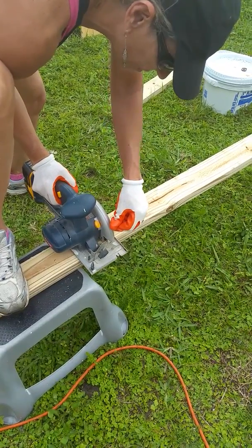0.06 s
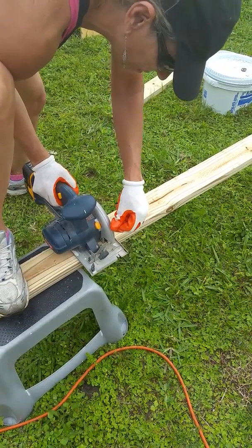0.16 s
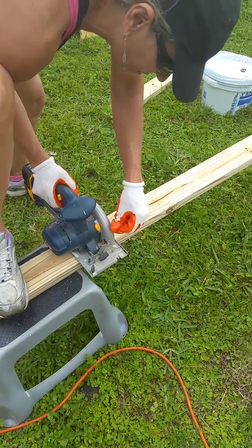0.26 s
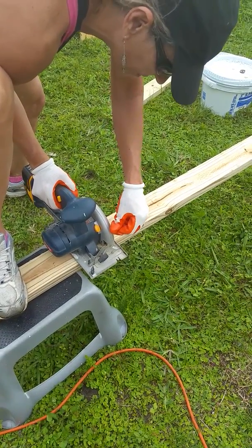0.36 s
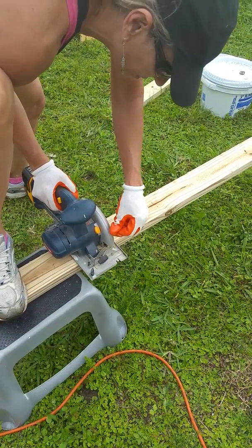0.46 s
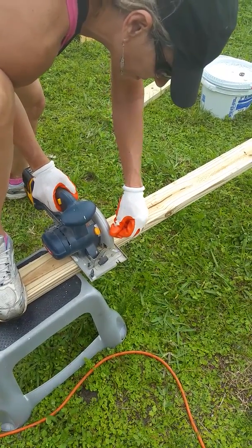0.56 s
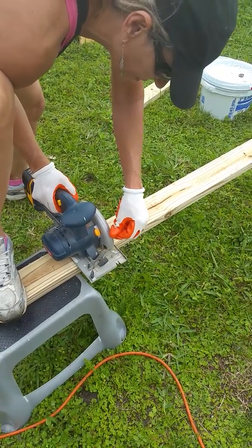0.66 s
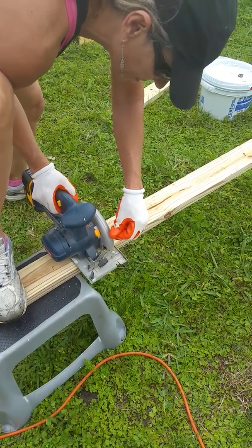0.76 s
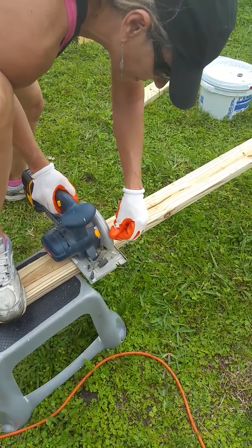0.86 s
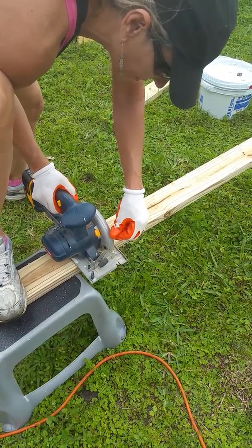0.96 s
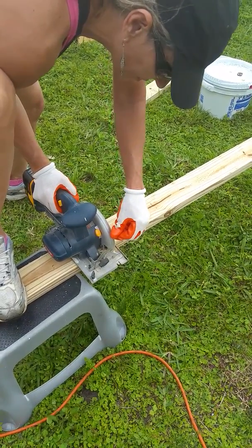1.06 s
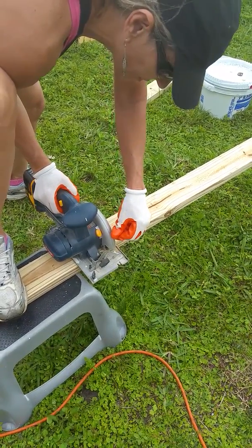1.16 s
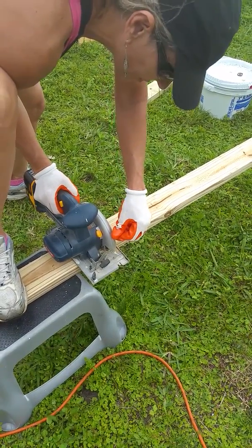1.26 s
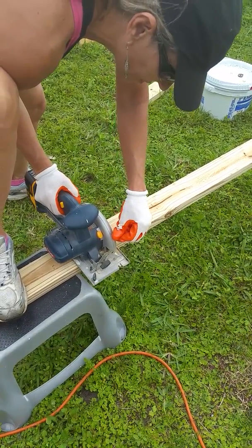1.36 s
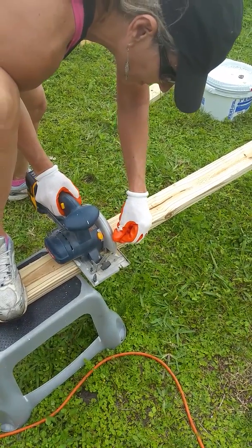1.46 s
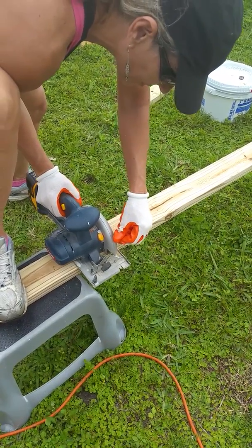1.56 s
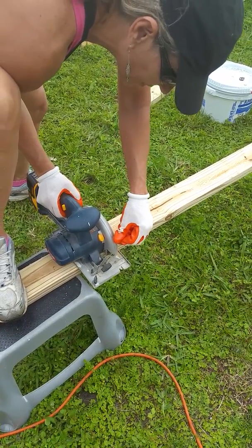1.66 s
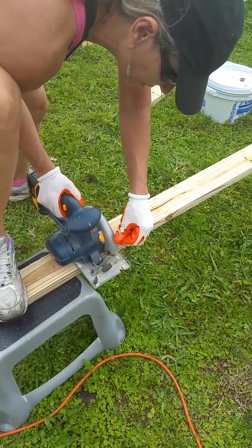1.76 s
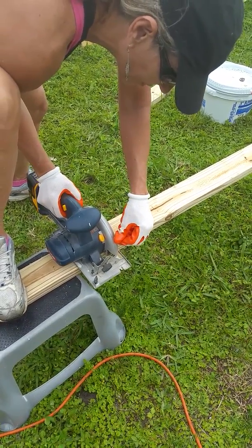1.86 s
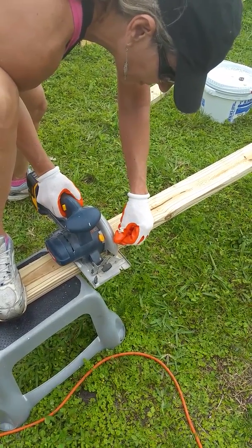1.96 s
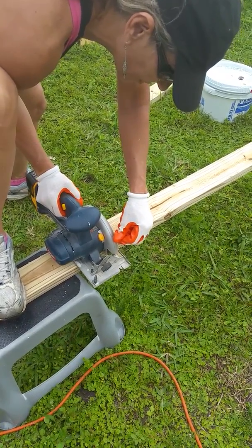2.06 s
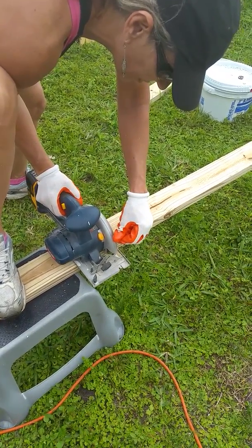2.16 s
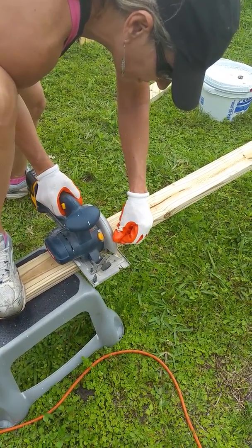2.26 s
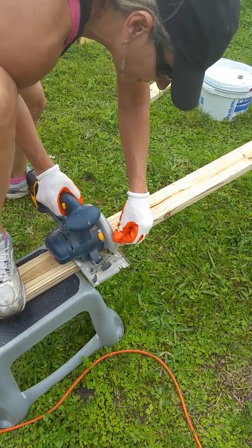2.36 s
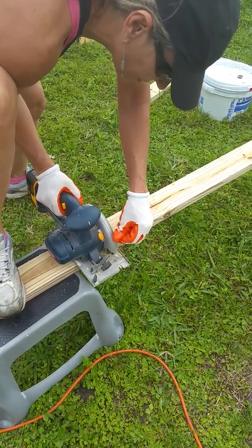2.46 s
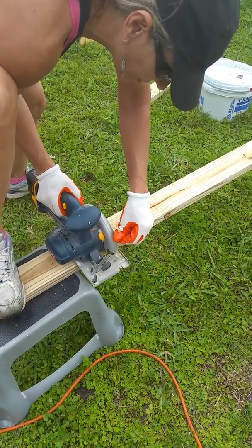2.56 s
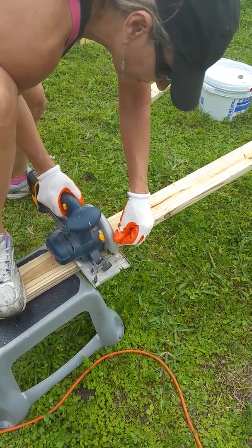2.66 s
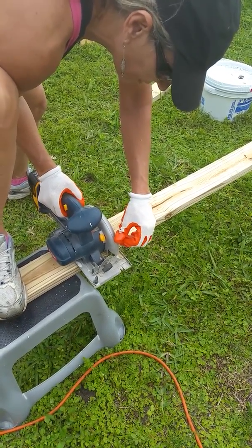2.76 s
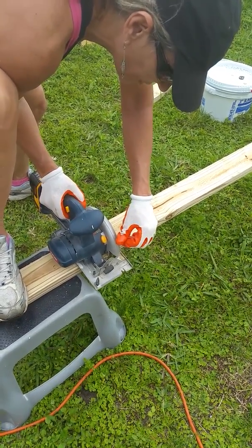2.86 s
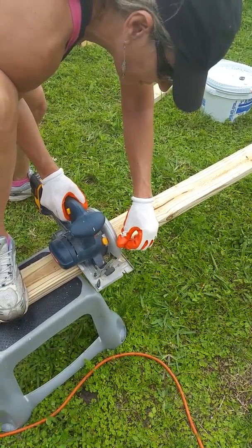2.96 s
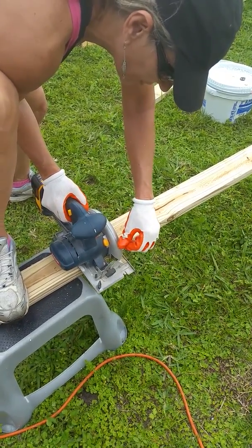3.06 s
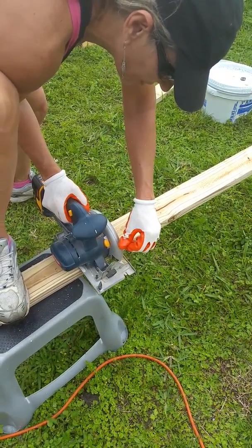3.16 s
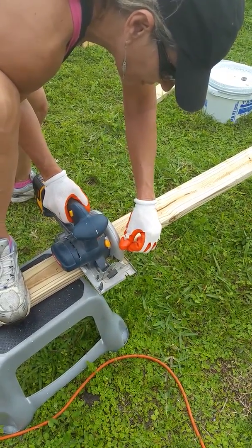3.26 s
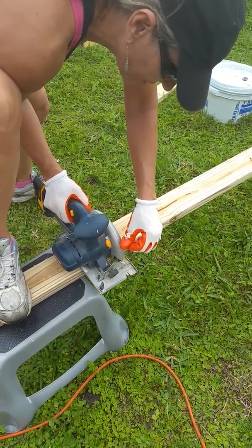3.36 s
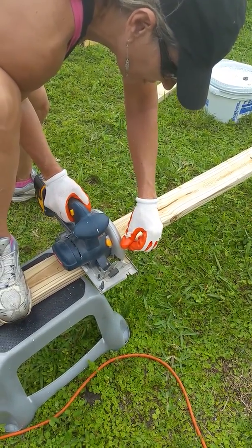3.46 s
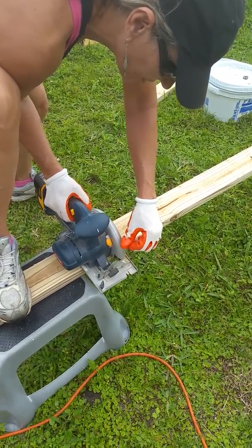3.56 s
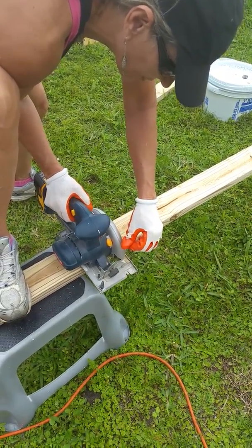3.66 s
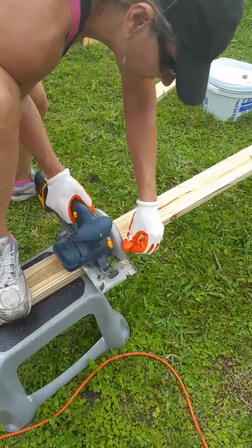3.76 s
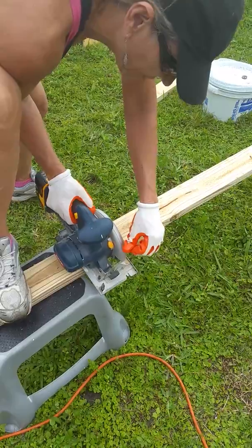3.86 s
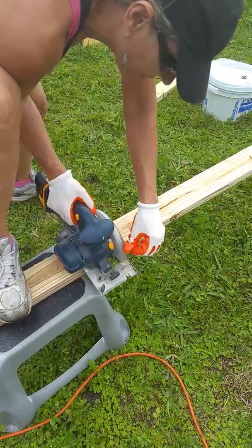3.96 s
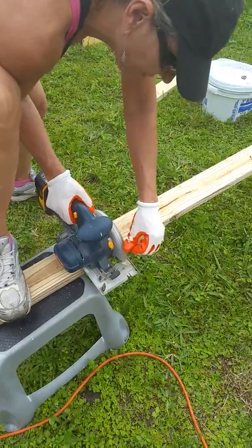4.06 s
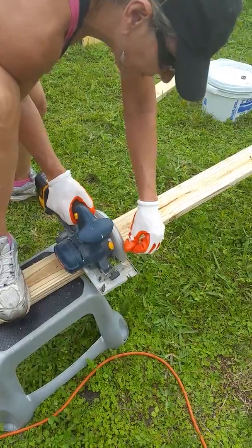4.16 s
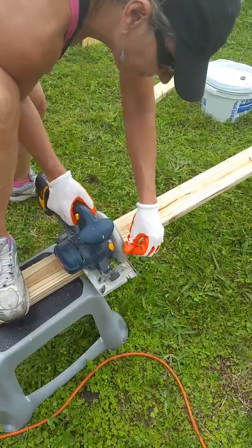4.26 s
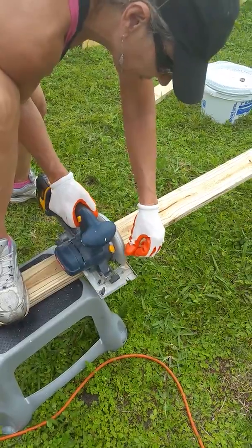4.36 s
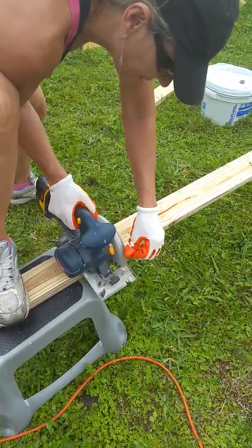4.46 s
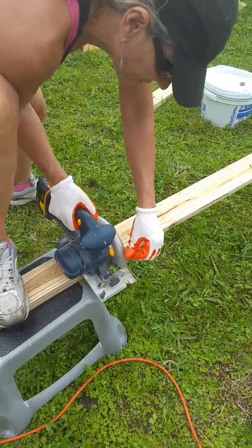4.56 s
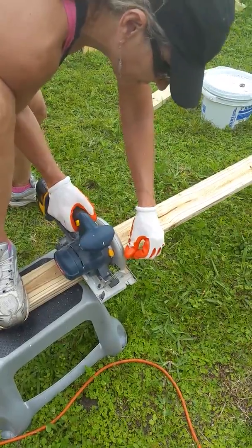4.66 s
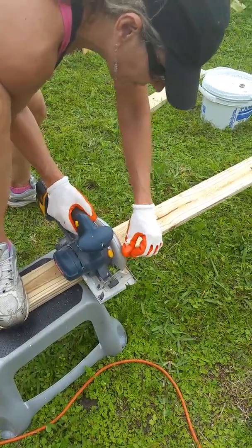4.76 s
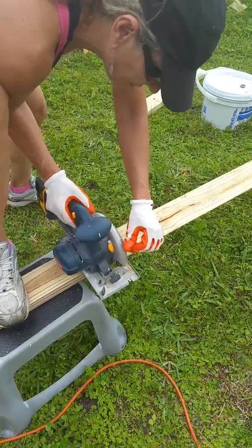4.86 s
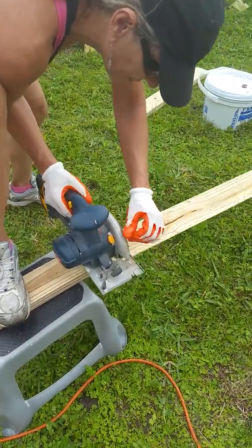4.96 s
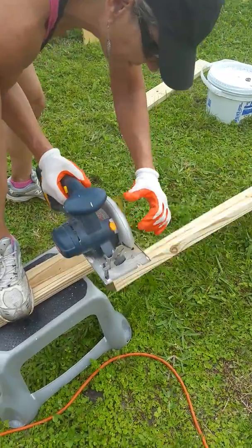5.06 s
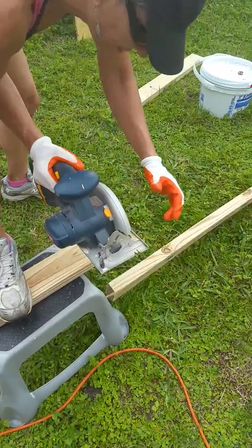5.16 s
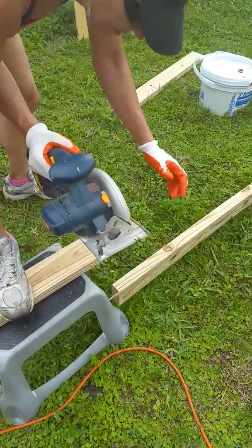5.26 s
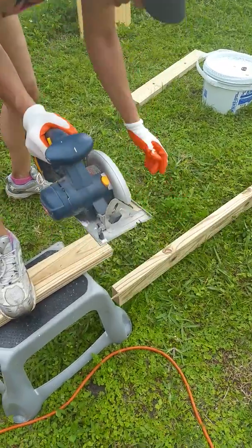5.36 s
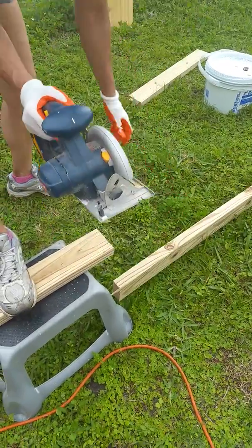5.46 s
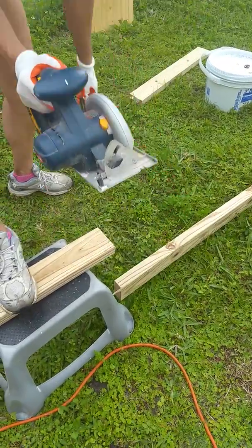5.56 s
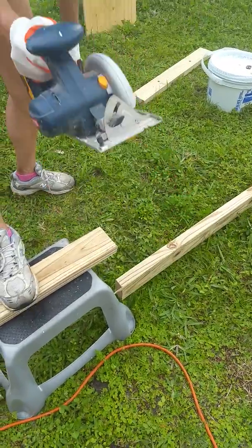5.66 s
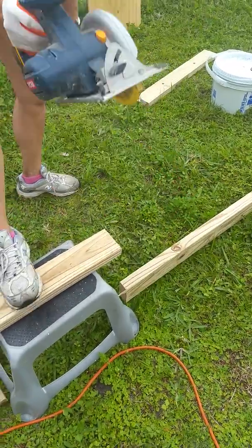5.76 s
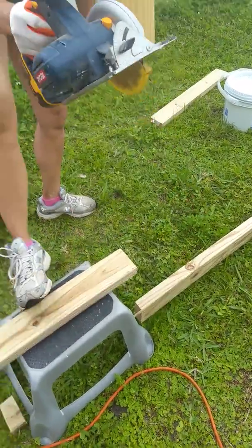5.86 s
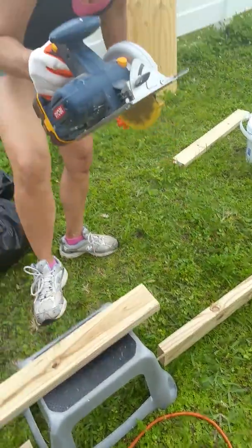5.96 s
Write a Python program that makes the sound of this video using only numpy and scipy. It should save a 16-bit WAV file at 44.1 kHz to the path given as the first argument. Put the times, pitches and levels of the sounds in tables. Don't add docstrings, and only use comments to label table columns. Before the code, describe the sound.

From 0 s a circular saw is cutting wood close by outdoors: dense bright hiss, woody mid-range roar and a gear whine, pulsing roughly fifty times a second. The pitch sinks until about 1.6 s, recovers slightly near 2.3 s, where a short dull bump hits the microphone, then sinks again. Around 3 s the cut pinches; the roar swells and speed drops sharply. From 3.1 to 4.3 s it labors unevenly with growling whine and ringing, stuttering grabs. At 4.4 s it brakes, falling into rapid gear knocks and brushy hiss, stopping at 4.77 s. Small ticks and quiet follow. At 5.1 s fibres crack; at 5.24 s a loud snap and hollow wooden knocks, with gritty metal scraping to 5.35 s. Lighter knocks and thuds come at 5.4-5.55 s, faint steel ringing until a tiny click near 5.8 s. Distant traffic and airy hiss rise, ending with a low wind puff at 6 s.

```python
import sys
import numpy as np
from scipy import signal
from scipy.fft import rfft, irfft, next_fast_len
from scipy.io import wavfile
from scipy.ndimage import uniform_filter1d, map_coordinates

SR = 44100
rng = np.random.default_rng(int(sys.argv[2]) if len(sys.argv) > 2 else 0)


def ratio_of_db(decibels):
    return 10 ** (np.asarray(decibels, float) / 20)


def store_wav(level_fs):
    pcm = np.round(np.clip(np.atleast_2d(level_fs), -1, 1) * 32767)
    wavfile.write(sys.argv[1], SR, pcm.T.astype(np.int16))


N = 265482
T = np.arange(N) / SR
STOP_S = 4.765
PROUD_TURN = 0.36

ORDERS = (18, 19, 42, 84, 168)
# time in seconds, level in dB.
COAST_LEVEL = [(4.3, -72), (4.385, -40), (4.415, -29), (4.455, -28), (4.49, -26), (4.52, -27), (4.56, -29),
               (4.7, -32), (4.73, -30), (4.757, -33), (4.772, -52), (4.82, -72)]
# centre in Hz, width in Hz, level in dB.
WOOD_MODES = [(705, 150, -5.5), (1130, 170, 1), (1474, 120, 0.5), (1677, 74, 5), (1856, 190, 0.5),
              (2390, 840, -6), (4120, 120, -22)]


def unit(x):
    return x / np.sqrt(np.mean(x ** 2) + 1e-20)


def along(points, hz):
    f, v = np.transpose(points)
    return np.interp(np.log(hz + 1), np.log(f + 1), v)


def curves(rows, outside=None):
    s, *cols = np.transpose(rows)
    return [np.interp(T, s, c, outside, outside) for c in cols]


def eased(rows):
    s, v = np.transpose(rows)
    slope = np.diff(v) / np.diff(s)
    a, b = slope[:-1], slope[1:]
    lean = np.r_[slope[0], np.where(a * b > 0, 2 * a * b / (a + b), 0), 0]
    i = np.clip(np.searchsorted(s, T) - 1, 0, len(s) - 2)
    h = s[i + 1] - s[i]
    u = np.clip((T - s[i]) / h, 0, 1)
    step = (v[i + 1] - v[i]) * u * u * (3 - 2 * u)
    bend = h * u * (1 - u) * ((1 - u) * lean[i] - u * lean[i + 1])
    return v[i] + step + bend


def wobble(rate):
    return map_coordinates(rng.standard_normal(int(N * rate / SR) + 4), [T * rate])


def hiss_pair():
    return rng.standard_normal((2, N))


def filtered(x, response):
    m = next_fast_len(N + 8192)
    return irfft(rfft(x, m) * response(np.fft.rfftfreq(m, 1 / SR)), m)[..., :N]


def modes(table):
    def response(f):
        return sum((-1) ** k * ratio_of_db(db) * 1j * f * w / (c * c - f * f + 1j * f * w)
                   for k, (c, w, db) in enumerate(table))
    return response


def coloured(x, spectrum):
    y = filtered(x, lambda f: ratio_of_db(along(spectrum, f)))
    return y / np.std(y.mean(axis=0))


def ports(pair, alike=None, lean=None):
    # frequency in Hz, left-right likeness.
    usual_alike = [(100, 0.3), (300, 0.83), (700, 0.49), (1400, 0.58), (3000, 0.5), (6000, 0.45),
                   (9000, 0.494), (14000, 0.3)]
    # frequency in Hz, left minus right in dB.
    usual_lean = [(60, 10), (110, -12), (200, 2), (380, -5.5), (700, 4.5), (1290, -3.5), (2380, -2),
                  (3100, -4), (4400, -6), (6200, -9), (8300, -7.5), (10500, -7.5), (15000, -17.5)]
    # frequency in Hz, left's lead in radians.
    lead = [(0, -0.5), (600, 0), (950, -1.17), (1720, 0.26), (4050, -1.2), (4740, 1.1), (5600, -0.7),
            (6370, -2.5), (7670, -2.0), (11800, -2.1), (14600, -9.5), (16400, -7.1)]
    alike = usual_alike if alike is None else alike
    lean = usual_lean if lean is None else lean

    def likeness(f):
        return np.clip(along(alike, f), 0, 1)

    shared = filtered(pair[0], lambda f: likeness(f) * np.exp(1j * along(lead, f)))
    other = filtered(pair[1], lambda f: np.sqrt(1 - likeness(f) ** 2))
    both = np.array([shared + other, pair[0]])
    return filtered(both, lambda f: ratio_of_db(np.outer([.5, -.5], along(lean, f))))


def rings(rows, swell_s):
    out = np.zeros(N)
    for s, db, hz in rows:
        age = np.maximum(T - s, 0)
        swell = age / swell_s * np.exp(1 - age / swell_s)
        out += ratio_of_db(db) * swell * np.sin(2 * np.pi * hz * age)
    return out


def tearing(s, db, swell_s, t60):
    return ratio_of_db(db - 60 * np.where(T < s, (s - T) / swell_s, (T - s) / t60))


def turns():
    # time in seconds, turns a second.
    loaded = [(0, 60), (.28, 56.3), (.5, 57.3), (.9, 54.66), (1.42, 48.7), (1.57, 47.8), (2.25, 51.65),
              (2.36, 51.2), (2.55, 47.5), (2.71, 46.1), (2.89, 45.4), (2.97, 43.2), (3.045, 41.9),
              (3.115, 42.4), (3.15, 40.4), (3.25, 33.2), (3.29, 31.4), (3.35, 31.3), (3.62, 37.75),
              (3.86, 30.5), (3.9, 31), (3.99, 33.4), (4.05, 34), (4.148, 36.8), (4.172, 34.4),
              (4.205, 32.6), (4.24, 33.9), (4.34, 36.1)]
    # time in seconds, turns a second.
    slowing = [(4.375, 28.5), (4.395, 24.5), (4.41, 21.7), (4.44, 19.6), (4.47, 16.8), (4.51, 13.3),
               (4.53, 11.3), (4.56, 10.8), (4.58, 9.6), (4.6, 9.4), (4.62, 8.7), (4.65, 8.3), (4.685, 7.1),
               (4.705, 7.05), (4.73, 7.5), (4.78, 6.5)]
    speed = uniform_filter1d(eased(loaded + slowing), size=500)
    return speed, np.cumsum(speed) / SR


def bound():
    bind_s = (3.02, 3.26)
    return np.interp(T, bind_s, (0, 1))


def braked():
    leave_s, lag_s = 4.375, 0.12
    return 1 - np.exp(-np.maximum(T - leave_s, 0) / lag_s)


def rim(angle, memory, bite_db):
    # time in seconds, share alike each turn.
    repeat = [(0, .72), (2.9, .72), (3.2, .4), (4.3, .4), (4.5, .2)]
    spots = 800
    fresh = rng.standard_normal((2, int(angle[-1]) + 2, spots))
    worn = signal.lfilter([np.sqrt(1 - memory ** 2)], [1, -memory], fresh, axis=1, zi=fresh[:, :1] * memory)[0]
    kept = np.array([unit(np.interp(angle * spots, np.arange(w.size), w.ravel())) for w in worn])
    share = np.clip(curves(repeat)[0], 0, 1)
    teeth = rng.standard_normal(18 * len(fresh[0]))
    bite = ratio_of_db(bite_db * map_coordinates(teeth, [18 * angle], order=1))
    return bite * (np.sqrt(share) * kept + np.sqrt(1 - share) * hiss_pair())


def patches(x, patchy_db):
    z = signal.stft(x, nperseg=512)[2]
    gain = rng.standard_normal(z.shape[1:])
    gain = uniform_filter1d(uniform_filter1d(gain, size=3, axis=0), size=40, axis=1)
    return signal.istft(z * ratio_of_db(patchy_db * unit(gain)), nperseg=512)[1][:, :N]


def cutting(angle):
    # centre in Hz, width in Hz, level in dB.
    plate = [(2420, 70, 0), (4650, 270, 0), (6535, 80, 3), (7450, 60, 0), (9500, 110, -1), (10450, 150, -2),
             (11600, 200, -1), (12330, 90, -1), (13150, 130, -2), (14550, 120, -1)]
    # frequency in Hz, level in dB per Hz.
    board = [(88, -48.5), (150, -25), (337, -4), (507, -8.5), (602, -4.5), (720, -6.5), (891, -2),
             (1150, 1.5), (1500, -20), (2530, -120)]
    slot = [(680, -60), (1150, -19), (1420, -5), (1620, 2.5), (1800, -1), (1960, -5.5), (2200, -18.5),
            (2860, -68.5), (4840, -120)]
    blade = [(1290, -27), (2200, -2.5), (2440, -5.5), (2620, -2), (2940, 0), (3500, -3.5), (4130, -1),
             (4750, -2.5), (5940, -6), (6510, -1.5), (7000, -7), (9100, -25.5), (15400, -120)]
    chips = [(4120, -46), (7000, -16), (7390, -5.5), (8700, -3.5), (9580, 0.5), (11000, 2), (11900, 2),
             (14000, -3.5), (15000, -7.5), (15750, -5.5), (15900, -38)]
    sag = [(850, -61.5), (1030, -29), (1110, 9), (1190, -9.5), (1400, -59)]
    pinch = [(1450, -60), (1580, -16), (1690, -2), (1790, 0), (1880, -5), (2000, -24), (2200, -60)]
    # dB over the feed, dB gained when bound, dB added under the brake.
    layers = [
        (-22, -1, -5),
        (-7, 3, -18.5),
        (-3, 0.5, -31.5),
        (-3.5, 1, -40),
        (-36.5, 15, -22),
        (-34.5, 20.5, -25.5),
    ]
    # time in seconds, level in dB.
    feed = [(0.0, -20), (0.12, -19), (0.18, -17.5), (0.7, -20.5), (0.93, -18), (1.88, -19), (2.13, -18.5),
            (3.28, -23), (3.59, -20), (3.69, -22.5), (3.93, -20.5), (4.27, -21.5), (4.34, -20)]
    # time in seconds, tilt in dB.
    tilt = [(0, 3), (.4, 0), (1, 0), (2, 0.5), (2.8, -1.5), (3.4, -0.5), (4.3, 0)]
    # time in seconds, gain in dB.
    closing = [(2.84, 0), (2.95, 3), (3.14, 7), (3.24, 0)]

    rub = ports(patches(rim(angle, memory=0.885, bite_db=1.5), patchy_db=1.7))
    rub = filtered(rub, lambda f: 1 + np.abs(modes(plate)(f)))
    shake = rub + ports(hiss_pair())
    rasp = rub * ratio_of_db(1.7 * np.cos(2 * np.pi * (angle + PROUD_TURN)))

    still = np.maximum(T - STOP_S, 0)
    ring_out_db = np.maximum(-1100 * still, -12 - 330 * still)
    feed_db = curves(feed)[0] + 0.16 * wobble(5.6) + ring_out_db
    tilt_db, = curves(tilt)
    sources = (shake, rub, rasp * ratio_of_db(0.45 * tilt_db), rasp * ratio_of_db(-tilt_db), shake, rub)
    bodies = (board, slot, blade, chips, sag, pinch)

    out = ratio_of_db(feed_db + layers[1][0]) * (ratio_of_db(curves(closing)[0]) - 1) * coloured(shake, slot)
    for (db, bind_db, brake_db), x, body in zip(layers, sources, bodies):
        judder_db = (0.16 + 1.5 * braked()) * wobble(20)
        level_db = feed_db + db + bind_db * bound() + brake_db * braked() + judder_db
        out += ratio_of_db(level_db) * coloured(x, body)
    return out


def kerf(speed, angle):
    # time in seconds, centre in Hz, width in Hz, level in dB.
    resonance = [(0, 1587, 35, -20), (.15, 1580, 100, -31), (.55, 1607, 45, -22.5), (.75, 1630, 40, -26),
                 (1.0, 1720, 170, -23), (1.3, 1580, 109, -29), (1.5, 1650, 30, -32.5),
                 (1.82, 1700, 111, -22.5), (2.04, 1700, 90, -25), (2.22, 1814, 100, -17.5),
                 (2.36, 1790, 100, -18), (2.47, 1700, 35, -28), (2.55, 1660, 28, -20),
                 (2.62, 1660, 40, -23), (2.71, 1660, 20, -21), (2.8, 1660, 30, -28), (2.88, 1670, 45, -25),
                 (2.96, 1555, 22, -25), (3.04, 1510, 30, -24)]
    hz, width, ring_db = curves(resonance)
    db = ring_db - 19 * bound() ** 2 - 200 * braked()
    burst, power = np.zeros(N), np.zeros(N)
    for k in range(22, 44):
        weight = np.exp(-.5 * ((k * speed - hz) / width) ** 2)
        phase = 2 * np.pi * k * (angle + PROUD_TURN) + .2 * wobble(5)
        burst += weight * ratio_of_db(1.2 * wobble(6.67)) * np.cos(phase)
        power += weight ** 2
    return ratio_of_db(db) * burst / np.sqrt(.5 * power + 1e-9)


def whine(speed, angle):
    # time in seconds, tooth phase scatter in radians.
    strain = [(2.3, .15), (3.1, .8), (4.6, 1.1)]
    # time in seconds, level in dB.
    tooth = [(0, -31), (.4, -34), (.62, -36), (.8, -37.5), (1.1, -34), (1.3, -33), (1.4, -43), (2.25, -45),
             (2.6, -47), (2.9, -50), (3.15, -54), (3.45, -46), (3.7, -53), (3.85, -44), (4.13, -43),
             (4.21, -48), (4.33, -35), (4.36, -38), (4.375, -48), (4.39, -47), (4.41, -38), (4.44, -40),
             (4.46, -81)]
    # time in seconds, level in dB.
    gear_load = [(0, -39), (.9, -46), (2.94, -38), (2.99, -25), (3.04, -28), (3.08, -33), (3.12, -26),
                 (3.155, -27), (3.18, -19), (3.21, -17), (3.26, -31), (3.3, -25), (3.41, -28), (3.45, -19),
                 (3.52, -16), (3.72, -17), (3.76, -22), (3.79, -31), (3.83, -25), (3.95, -24), (3.99, -17),
                 (4.05, -18), (4.11, -21), (4.15, -22), (4.17, -19), (4.19, -23), (4.206, -26),
                 (4.225, -18), (4.345, -17), (4.37, -27), (4.4, -36), (4.43, -70)]
    # frequency in Hz, level in dB.
    gear_case = [(1600, -20), (2200, -36), (2700, -48), (3300, -50), (3480, -38), (3700, -31),
                 (3850, -30.5), (4050, -30), (4230, -31), (4340, -46), (4700, -50)]
    # time in seconds, level in dB.
    octave_wakes = [(2.3, -14), (2.42, 0)]
    # time in seconds, level in dB.
    whistle = [(.1, -60), (.2, -33), (.5, -31), (.75, -35), (.9, -60)]

    flutter = curves(strain)[0] * wobble(45)
    steady = .2 * wobble(25)
    unload_db = -35.5 * braked() - 120 * (T > STOP_S)
    tooth_db, = curves(tooth, -120)
    mesh_db, = curves(gear_load)
    whistle_db, = curves(whistle, -120)
    sideband_db = np.maximum(whistle_db - 3, -49.5 + unload_db)
    octave_db = along(gear_case, ORDERS[3] * speed) + curves(octave_wakes)[0] + unload_db

    levels = (tooth_db, sideband_db, mesh_db, octave_db, whistle_db)
    drifts = (flutter, flutter, steady, steady, 4 * steady)
    wavers_db = (2.5, 2.5, .8, 1.2, 2.5)
    out = np.zeros(N)
    for k, db, drift, waver_db in zip(ORDERS, levels, drifts, wavers_db):
        level = np.sqrt(2) * ratio_of_db(db + waver_db * wobble(25.16))
        out += level * np.sin(2 * np.pi * k * angle + drift)
    return out


def yard():
    # time in seconds, level in dB.
    air_level = [(0, -57.5), (4.4, -59.5), (4.8, -51.5), (5.1, -50), (5.6, -45.5), (6.02, -47)]
    # frequency in Hz, level in dB per Hz.
    traffic = [(25, -33), (55, -14), (75, 1.5), (95, -7.5), (130, -4.5), (200, -14.5), (240, -18),
               (340, -38), (570, -120)]
    murmur = [(150, -42), (250, -12), (500, -8.5), (800, -7.5), (1300, -13.5), (2500, -25), (4000, -31.5),
              (8000, -41.5), (15500, -52)]
    mic_hiss = [(2500, -40), (5000, -1), (11000, -4.5), (15500, -5.5)]
    # time in seconds, level in dB.
    buffet = [(5.9, -69.5), (5.96, -51), (6.02, -29.5)]
    # time in seconds, level in dB.
    settle = [(0, -73), (4.8, -62.5), (5.05, -73.5), (5.6, -70.5)]
    # time in seconds, pitch in Hz, level in dB, 60 dB fade in seconds.
    insect = (6.5, 6300.5, -66.5, 3)

    def noise(alike):
        return ports(hiss_pair(), [(100, alike)], [(100, 0.0051)])

    air_db, = curves(air_level)
    rumble = ratio_of_db(air_db + 0.5 + 1.06 * wobble(11.0)) * coloured(noise(0.91), traffic)
    air = ratio_of_db(air_db + 0.535 * wobble(10.0)) * coloured(noise(0.43), murmur)
    puff = coloured(noise(0.99), [(20, -33.0), (50, 3.5), (110, 4), (250, -29), (500, -120)])
    wind = ratio_of_db(curves(buffet, -120)[0]) * puff
    s, hz, db, t60 = insect
    band = coloured(noise(.6), [(1.1 * hz, -30), (hz, 0), (1.15 * hz, -30)])
    chirp = ratio_of_db(db - 60 * np.abs(T - s) / t60) * band
    return rumble + air + wind + chirp + ratio_of_db(curves(settle)[0]) * coloured(noise(.2), mic_hiss)


def squeals(angle):
    # middle in seconds, half length in seconds, cycles a turn, level in dB.
    meetings = [(.39, .06, 37, -30), (.92, .07, 36, -25), (1.14, .06, 46, -31), (1.18, .05, 47, -30),
                (2.72, .22, 19, -41), (2.75, .07, 39, -31)]
    out = np.zeros(N)
    for s, half_s, k, db in meetings:
        swell = np.exp(-.5 * ((T - s) / half_s) ** 4)
        out += ratio_of_db(db + 1.9 * wobble(30)) * swell * np.sin(2 * np.pi * k * angle)
    return out


def thump():
    # time in seconds, level in dB, rate in Hz.
    pushes = [
        (2.319, -9, 2230),
        (5.2106, -25, 560),
        (5.222, -22, 500),
        (5.395, -30, 560),
        (5.444, -38, 600),
    ]
    out = np.zeros(N)
    for s, db, hz in pushes:
        u = np.maximum(T - s, 0) * hz
        out += ratio_of_db(db) * u * (2 - u) * np.exp(-u)
    return out


def grabs():
    # time in seconds, peak in dB, pitch in Hz.
    snatches = [(3.114, -15.5, 1790), (3.1986, -26, 1770), (3.2413, -14, 1660), (3.2711, -14.5, 1790),
                (3.3175, -20.5, 1810), (3.3497, -23, 1820), (3.3693, -31, 1690), (3.528, -21, 1800),
                (3.55, -20.5, 1860), (3.6122, -21, 1670), (3.6335, -19, 1670), (3.6821, -16, 1790),
                (3.718, -15.5, 1810), (3.7426, -11.5, 1760), (3.7626, -10, 1670), (3.7938, -11, 1810),
                (3.81, -9, 1600), (3.8701, -14, 1760), (3.905, -18.5, 1820), (3.927, -10, 1740),
                (3.96, -13, 1780), (3.9909, -13, 1810), (4.022, -17.5, 1800), (4.095, -14, 1640),
                (4.129, -13, 1650), (4.155, -14, 1730), (4.1964, -15, 1700), (4.319, -16, 1690),
                (4.3404, -15, 1800)]
    return ratio_of_db(-2.0) * rings(snatches, swell_s=0.0027)


def coast(angle):
    # centre in Hz, width in Hz, level in dB.
    housing = [(352, 60, -10), (475, 39, -8), (590, 46, -3), (910, 100, -17), (1255, 100, -4),
               (1550, 110, 5), (1800, 140, 1), (2050, 160, -6), (2400, 160, -12), (2860, 200, -12),
               (3650, 250, -9), (4300, 300, -9)]
    # frequency in Hz, level in dB.
    hollow = [(630, 0), (750, -11), (880, 0)]
    # time in seconds, level in dB.
    flank_level = [(4.385, -60), (4.402, -25), (4.445, -22), (4.475, -36), (4.52, -37), (4.555, -36),
                   (4.575, -60)]
    mesh = 2 * np.pi * ORDERS[2] * angle
    knocks = np.exp(25 * (np.cos(mesh + .6 * wobble(52)) - 1))
    knocks = knocks * ratio_of_db(2 * wobble(200) + 2.5 * wobble(40))
    ring = filtered(knocks, lambda f: modes(housing)(f) * ratio_of_db(along(hollow, f)))
    ring = ring / np.sqrt(np.abs(uniform_filter1d(ring ** 2, size=3000)) + 1e-9)
    flank_db = curves(flank_level, -120)[0] + 3 + 2.5 * wobble(60)
    flanks = ratio_of_db(flank_db) * np.sin(2 * mesh + .8 * wobble(60))
    return flanks + ratio_of_db(curves(COAST_LEVEL, -120)[0]) * ring


def brushes(angle):
    # frequency in Hz, level in dB per Hz.
    sparks = [(2000, -30), (2600, 0.5), (4200, 3.5), (5200, -18), (8000, -24), (9500, -14), (11500, -2),
              (13200, -7), (14200, -30), (16000, -120)]
    pulse_db = 4 * np.cos(2 * np.pi * ORDERS[0] * angle + wobble(40)) + 2 * wobble(44)
    level_db = curves(COAST_LEVEL, -120)[0] - 17 + pulse_db
    return ratio_of_db(level_db) * coloured(ports(hiss_pair()), sparks)


def landing():
    # time in seconds, level in dB, 60 dB fade in seconds.
    drops = [(4.405, -39, 0.3), (4.53, -41, 0.17), (5.194, -40.5, 0.077), (5.225, -44, 0.3),
             (5.41, -42, 0.16)]
    thud = coloured(hiss_pair(), [(40, -28), (70, -14), (160, -12.0), (320, 2.5), (600, -2.0), (2000, -120)])
    return thud * sum(tearing(s, db, 0.029, t60) for s, db, t60 in drops)


def contacts(body, fibres):
    # time in seconds, peak in dB, crack in dB, left minus right in dB.
    hits = [(4.626, -39, -0.5, 0), (4.654, -43, -2, -6), (4.667, -42, -1.5, -5.5), (4.749, -35, -2.5, -6),
            (4.758, -28, -6.5, -7.5), (4.826, -42.5, -5.5, -4.5), (4.844, -45.5, -2, -6.5),
            (5.106, -22, -23, 4.5), (5.117, -26, -3, -9.5), (5.192, -27.5, -13, -6),
            (5.2115, -31, -10.5, -5), (5.2394, -8, -17.5, -1), (5.261, -14, -16.5, -1),
            (5.3125, -15.5, -16.5, -3), (5.327, -20.5, -18.5, -3), (5.409, -20, -15.5, 2),
            (5.469, -34, -15, -10), (5.476, -37.5, -10.5, -4.5), (5.506, -31.5, -25, -1.5),
            (5.534, -29, -25.5, -5.5)]
    # time in seconds, peak in dB, pitch in Hz.
    raps = [(5.106, -33, 1530), (5.121, -38, 3910), (5.127, -34, 940), (5.1925, -28.5, 1020),
            (5.1935, -33, 312), (5.2345, -22, 1750), (5.239, -15.5, 1810), (5.248, -17, 1130),
            (5.2555, -18, 1840), (5.2625, -14.5, 1760), (5.2765, -25, 1880), (5.4085, -23, 1235),
            (5.41, -28, 2200), (5.4165, -34, 2200), (5.423, -32, 690), (5.507, -36, 1350),
            (5.535, -34, 1170), (5.539, -36, 2380), (5.68, -41, 996)]
    # time in seconds, peak in dB, pitch
    # in Hz.
    ticks = [(4.626, -43, 7040), (4.749, -46, 8600), (4.757, -43, 5460), (5.766, -56, 7500),
             (5.815, -46, 6400), (5.8155, -54, 9500), (5.823, -47, 11500), (5.8235, -49, 6500),
             (6.015, -54, 12500)]
    halves = np.array([.5, -.5])
    blows, out = np.zeros((2, N)), np.zeros((2, N))
    for s, db, crack_db, pan_db in hits:
        blows[:, round(s * SR)] = ratio_of_db(db + 15.5 + halves * pan_db)
        age = np.maximum(T - s, 0)
        fade = (T >= s) * ratio_of_db(-60 * age / 0.08) * ratio_of_db(halves[:, None] * pan_db)
        crack = ratio_of_db(db + crack_db - 4.5) * fibres * ratio_of_db(-60 * age / 0.042)
        out += fade * (ratio_of_db(db - 13.5) * body + crack)
    out += filtered(blows, modes(WOOD_MODES))
    out += rings(raps, swell_s=.002) * ratio_of_db([[-.7], [.7]])
    return out + rings(ticks, swell_s=0.00046) * ratio_of_db([[-2], [2]])


def tears(body, fibres):
    # break in seconds, wood in dB, fibres over wood in dB, swell in seconds, 60 dB fade in seconds.
    breaks = [(5.115, -44.5, -0.5, 0.032, .13), (5.23, -39, -6, .25, .1), (5.238, -21, -12, 0.02, 0.51),
              (5.376, -44, -9, 0.13, 1.3)]
    out = np.zeros((2, N))
    for s, db, over_db, swell_s, t60 in breaks:
        out += tearing(s, db - 2.5, swell_s, t60) * body
        out += tearing(s, db + over_db, swell_s, 0.57 * t60) * fibres
    return out


def offcut():
    grains = ports(hiss_pair() * ratio_of_db(1.4 * wobble(300)), lean=[(100, -2)])
    body = unit(filtered(grains, modes(WOOD_MODES)))
    fibres = coloured(grains, [(2500, -35), (3500, 0.0), (8000, -4.5), (15000, -7.5)])
    return contacts(body, fibres) + tears(body, fibres)


def guard():
    # start in seconds, end in seconds, level in dB, dB added by the end.
    scrapes = [(5.237, 5.289, -24, -5), (5.31, 5.344, -34, -3.5)]
    # centre in Hz, width in Hz, level in dB.
    sheet = [(2610, 150, 1), (3100, 150, 1.5), (4130, 250, 3), (5200, 300, -8), (5970, 200, -2.5),
             (7300, 250, 1.5), (8830, 300, -8.5), (12200, 830, -5.5)]
    edge_s = .003
    grit = ports(hiss_pair() * ratio_of_db(2.5 * wobble(400)), lean=[(100, -9.5)])
    metal = unit(filtered(grit, lambda f: 0.25 * (f > 2500) + np.abs(modes(sheet)(f))))
    level = np.zeros(N)
    for start, end, db, lost_db in scrapes:
        times = (start - edge_s, start, end, end + 2 * edge_s)
        level += ratio_of_db(np.interp(T, times, (db - 41.0, db, db + lost_db, db - 40), -200, -200))
    return metal * level


def blade_ring():
    # pitch in Hz, level in dB, 60 dB fade in seconds.
    steel = [(1502, -55, 2.5), (2487, -43.5, 1.7), (3397, -52.5, .85)]
    struck_s, damped_s = 5.365, 5.75
    age = np.maximum(T - struck_s, 0)
    damp_db = 400 * np.maximum(T - damped_s, 0)
    out = np.zeros(N)
    for hz, db, t60 in steel:
        level = ratio_of_db(db - 60 * age / t60 - damp_db + 2.5 * wobble(23)) * (age > 0)
        out += level * np.sin(2 * np.pi * hz * age + .7 * wobble(30))
    return out


def scene():
    # frequency in Hz, left-right likeness of the saw's tones.
    tones_alike = [(700, .7), (1200, .96)]
    speed, angle = turns()
    tones = kerf(speed, angle) + whine(speed, angle) + squeals(angle) + grabs() + coast(angle)
    tones = ratio_of_db(-1.5) * tones
    saw = cutting(angle) + ports([tones, np.roll(tones, 18)], tones_alike) + brushes(angle)
    parting = landing() + offcut() + guard() + blade_ring()
    return saw + parting + thump() + yard()


def band_limit(x):
    return signal.sosfilt(signal.butter(12, 16150, fs=SR, output="sos"), x)


def record(dry):
    held = dry / (1 + np.abs(dry / 0.72) ** 8) ** (1 / 8)
    mix = filtered(held, lambda f: f < 15800)
    return band_limit(mix)


dry = scene()
out = record(dry)
store_wav(out)
```